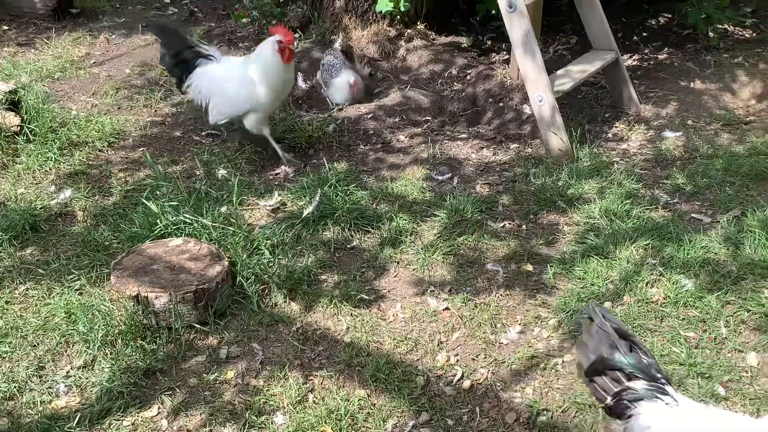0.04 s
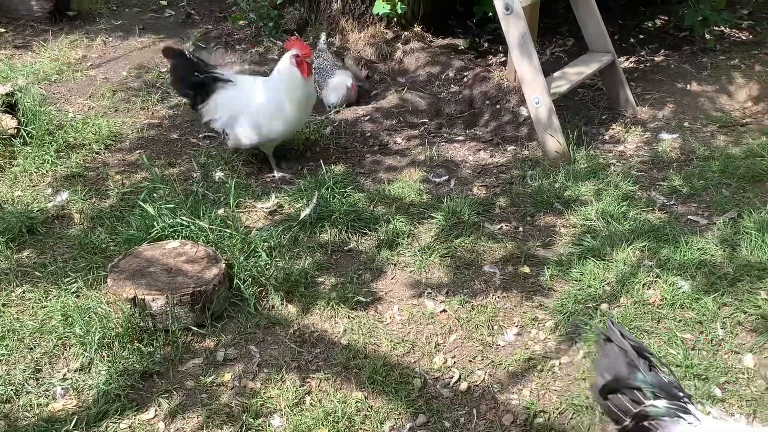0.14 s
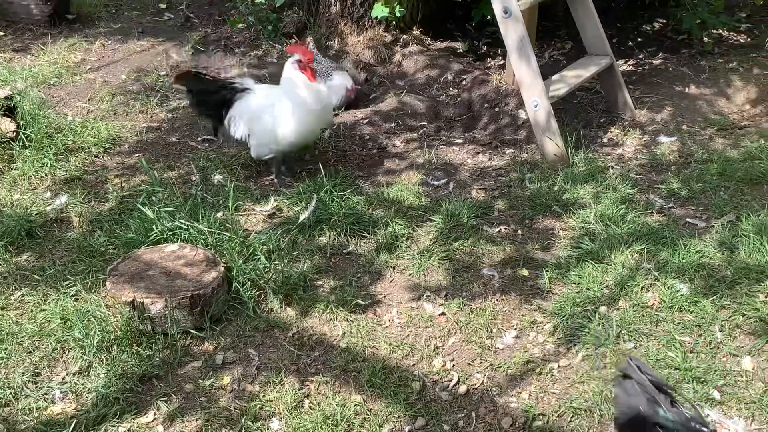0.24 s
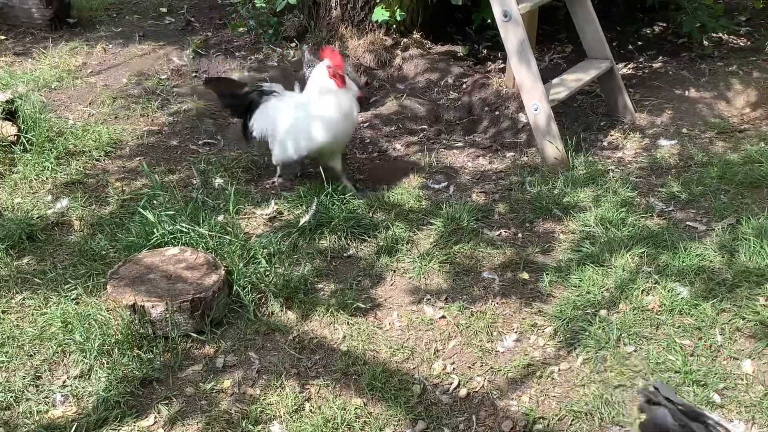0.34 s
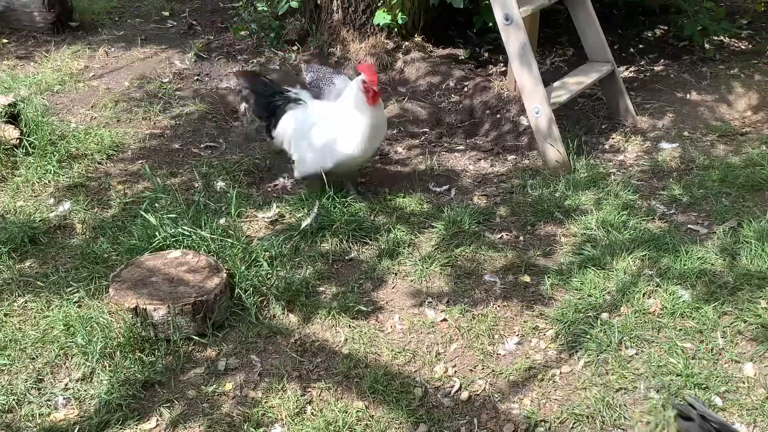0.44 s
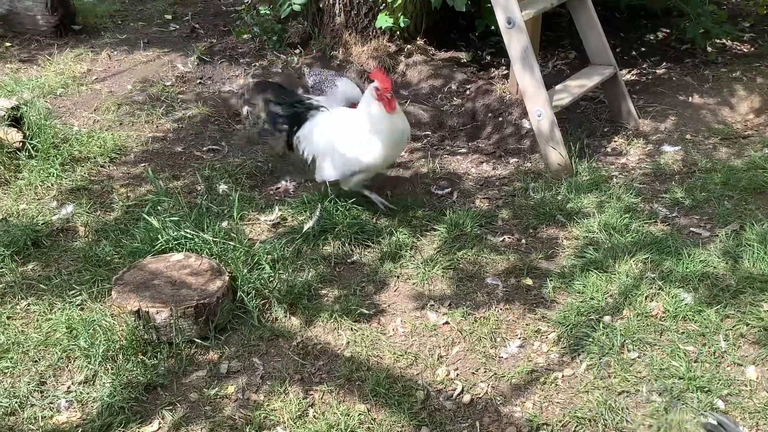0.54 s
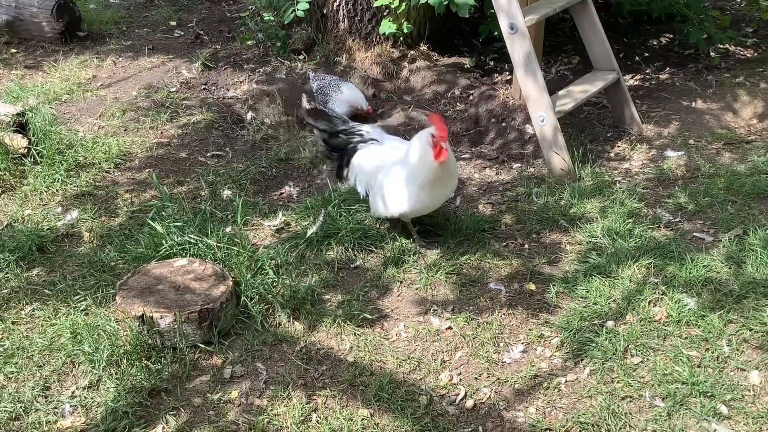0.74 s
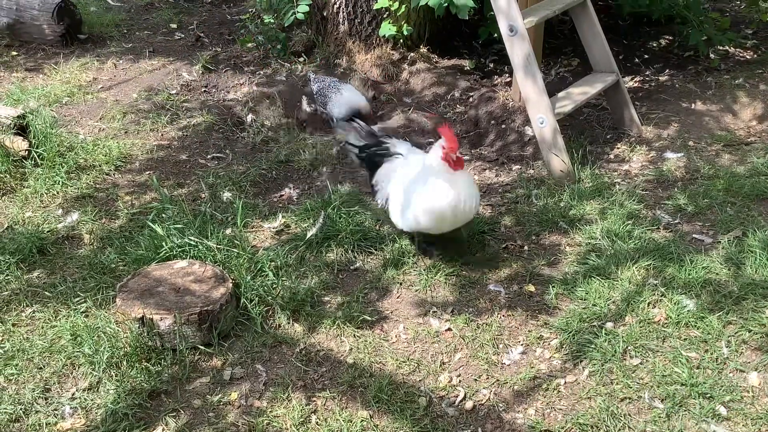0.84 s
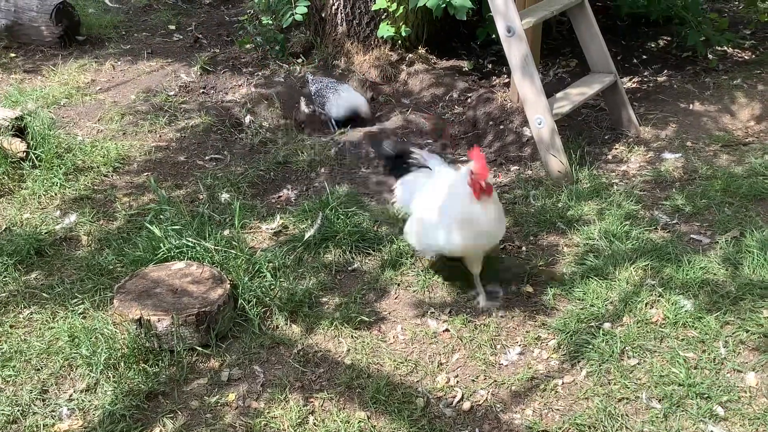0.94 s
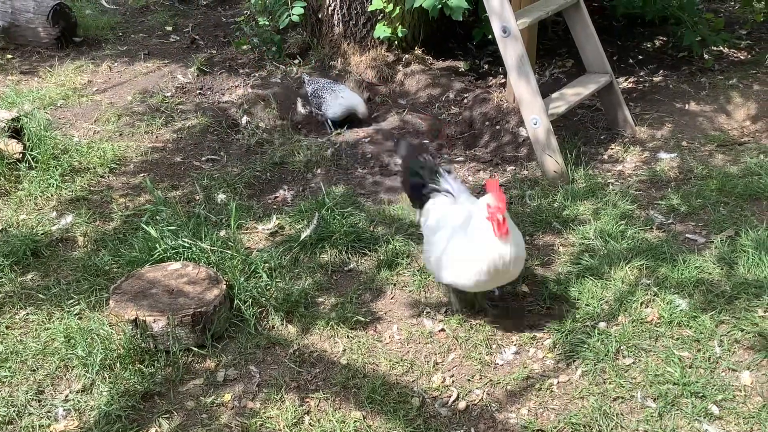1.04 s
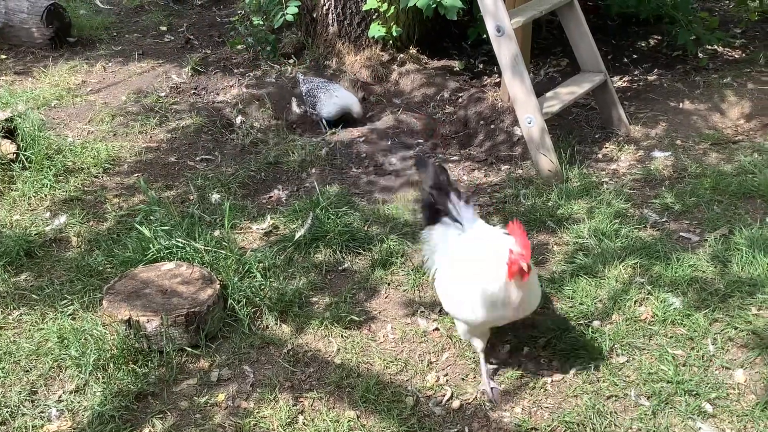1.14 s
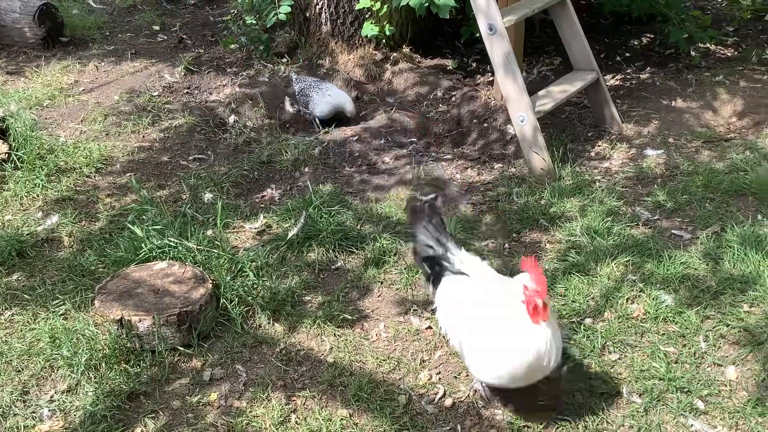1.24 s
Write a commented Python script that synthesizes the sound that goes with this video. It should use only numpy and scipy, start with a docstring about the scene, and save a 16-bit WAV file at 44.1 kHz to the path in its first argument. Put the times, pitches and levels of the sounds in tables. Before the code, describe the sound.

A rooster clucks and squawks twice in a quiet grass pen, then a hen clucks softly

```python
"""A grass pen with chickens, before a quiet outdoor background and short echoes from fence and trees.
A rooster clucks and gives two longer squawks, the first raspy, the second clear; a hen answers with softer
clucks and another whines far off. Each voice is a train of syrinx pulses ringing a throat filter, plus rasp.
Feet pad on soil, brush the grass and snap a dry leaf: shaped noise. Echoes are delays and a scattered tail."""
import sys
import numpy as np
from scipy import signal
from scipy.fft import rfft, irfft, next_fast_len
from scipy.io import wavfile
from scipy.ndimage import uniform_filter1d

SR = 44100
rng = np.random.default_rng(int(sys.argv[2]) if len(sys.argv) > 2 else 0)


def dump_mix(stems):
    """Bounce the given channels to the path in sys.argv[1] as a 16-bit WAV at rate SR."""
    frames = np.atleast_2d(stems).T  # one column per channel
    limited = np.clip(frames, -1, 1)  # hard clip at full scale
    pcm = np.round(limited * 32767).astype(np.int16)
    wavfile.write(sys.argv[1], SR, pcm)


N = 57330
T = np.arange(N) / SR  # s
CUTOFF_HZ = 15900  # upper edge of the harmonics and of the finished sound
TREBLE_HZ = 1560  # corner above which effort brightens a voice and the ground reflects

# Turbulent rasp of both squawks, relative spectrum [f/Hz, level/dB]
RASP_SPECTRUM = [(280, -38.5), (450, -16), (650, -4), (950, 4), (1150, -10), (1350, -21), (1550, -2),
                 (1820, -25), (2250, -13), (2650, -9), (3250, -18), (3900, -16), (4700, -17.5), (5400, -26),
                 (6300, -16.5), (9600, -28.5), (12500, -46), (16000, -56.5)]
# Course of the raspy squawk [t/s, pitch f/Hz, level/dB, treble level/dB, roughness level/dB]
RASPY_COURSE = [(.1925, 1052, -39, -12, -0.5), (.1955, 719, -29.5, -6.5, -1.5), (.2, 569.5, -27, -5.5, 1),
                (.206, 627.7, -26.5, 0, 5.5), (.213, 719.4, -23, -1, 2), (.224, 755, -20.5, 0, 0.5),
                (.238, 780.5, -20.5, -0.5, 0.5), (.254, 742.4, -21, 2.5, -2), (.263, 673, -23, 2.5, -7),
                (.269, 635, -27.5, 4.5, -4)]
# Throat resonances of the raspy squawk [f/Hz, level/dB]
RASPY_RESONANCES = [(300, -26.5), (520, -4.5), (760, -0.5), (1150, 0), (1330, -19), (1520, -11),
                    (1850, -21), (2250, -18), (2650, -10), (3250, -35), (3850, -23.5), (4700, -24.5),
                    (5400, -42), (6600, -36.5), (9600, -37.5), (12500, -54.5), (16000, -62)]


def raspy_squawk():
    """Subharmonics and turbulence: strongly uneven cycles and loud rasp roughen the rooster's call."""
    quality = dict(jitter=0.06, half_db=-8.5, rasp_db=-10, shimmer=0.0871)
    return long_call(RASPY_COURSE, RASPY_RESONANCES, quality, RASP_SPECTRUM)


# Course of the clear squawk [t/s, pitch f/Hz, level/dB, treble level/dB, roughness level/dB]
CLEAR_COURSE = [(.3675, 299.2, -41, -15, 5), (.372, 337, -43, -13, 4), (.379, 446.8, -38.5, -12, 10),
                (.384, 495.7, -29, -7.5, 8.5), (.391, 589.7, -26.5, -7.5, 1), (.398, 656, -26.5, 4, -12.5),
                (.412, 668, -24, 1, -10), (.42, 686, -22.5, 1, 1.5), (.433, 685.5, -23.5, 2, 2),
                (.44, 655, -24, -2.5, 2), (.446, 610, -35, -2, 3)]
# Throat resonances of the clear squawk [f/Hz, level/dB]
CLEAR_RESONANCES = [(300, -17), (500, -3), (680, 0), (1000, -1), (1350, -15), (1650, -34), (2050, -16.5),
                    (2650, -14.5), (3300, -29.5), (4050, -37.5), (4620, -21.5), (5400, -47.5),
                    (6500, -38.5), (7450, -28.5), (8500, -56.5), (9400, -32), (11000, -45.5),
                    (12200, -76.5), (16000, -49)]


def clear_squawk():
    """Harmonic excitation: steadier cycles and fainter rasp leave the rooster's harmonics plain."""
    quality = dict(jitter=0.03, half_db=-22, rasp_db=-18, shimmer=0.0321)
    return long_call(CLEAR_COURSE, CLEAR_RESONANCES, quality, RASP_SPECTRUM)


ROOSTER_QUALITY = dict(jitter=0.04, half_db=-24.5, rasp_db=-24, shimmer=0.12)  # terms as in voice()
# Course of the loudest cluck [t/s, pitch f/Hz, level/dB, treble level/dB, roughness level/dB]
LOUD_COURSE = [(.568, 380.1, -40, -1, 7.5), (.574, 456.1, -29, -3, 3), (.58, 494.3, -22, -0.5, -3.5),
               (.59, 506.8, -22.5, -5, 2), (.596, 500, -22, 2.5, 1.5), (.6, 596, -27, 5.5, 21),
               (.605, 620, -28, 6.5, 7.5), (.611, 592, -39, 4, 3)]
# Throat resonances of the loudest cluck [f/Hz, level/dB]
LOUD_RESONANCES = [(260, -14.5), (480, -10.5), (600, -4.5), (760, -2), (1020, 2), (1220, -11.5),
                   (1520, -21.5), (1780, -34), (2050, -21.5), (2350, -33), (3080, -24), (3900, -51),
                   (4600, -43.5), (5800, -54), (7400, -47.5), (9000, -55.5), (16000, -70)]


def loud_cluck():
    """Register break: the pitch of the rooster's loudest cluck leaps upward near its end."""
    return long_call(LOUD_COURSE, LOUD_RESONANCES, ROOSTER_QUALITY, LOUD_RESONANCES)


# The rooster's soft clucks [t/s, length t/s, first pitch f/Hz, top pitch f/Hz, pitch rise t/s,
# swollen level/dB, swell level/dB, treble level/dB, throat tuning/ratio]
ROOSTER_ROWS = [(.0765, 0.037, 296.5, 435, 0.022, -31.5, 12.5, -2, 1.0),
                (.808, 0.015, 265.8, 281, 0.0062, -37, 9, -10, 0.98)]
# Throat resonances of the rooster's soft clucks, before tuning [f/Hz, level/dB]
ROOSTER_RESONANCES = [(270, -8.5), (440, -11), (560, -1), (720, 3), (820, -11), (890, -0.5), (1100, 2),
                      (1330, -26), (2200, -33), (3500, -29), (5000, -45.5), (7200, -60), (8000, -39),
                      (9500, -61), (16000, -67)]


def rooster_clucks():
    """Source and filter: short pulse trains of gliding pitch ring the rooster's throat."""
    return clucks(ROOSTER_ROWS, ROOSTER_RESONANCES, ROOSTER_QUALITY)


# The hen's clucks [t/s, length t/s, first pitch f/Hz, top pitch f/Hz, pitch rise t/s,
# swollen level/dB, swell level/dB, treble level/dB, throat tuning/ratio]
HEN_ROWS = [(.659, 0.029, 290, 433.3, 0.017, -42, 13.5, -1.9, 1.01),
            (.887, 0.034, 285, 451, 0.027, -41.5, 15.2, 0.11, 0.96),
            (1.098, 0.034, 275, 456.9, .021, -41.5, 7.9, -0.9, 1.013)]
# Throat resonances of the hen, before tuning [f/Hz, level/dB]
HEN_RESONANCES = [(280, -6), (440, -8), (650, -7), (900, -3.5), (1350, 0), (1750, -20), (2150, -24.5),
                  (2700, -20), (3200, -32), (3700, -21.5), (4400, -36.5), (5300, -26.5), (6200, -42),
                  (8300, -44), (9500, -34.5), (11500, -48), (16000, -57)]


def hen_clucks():
    """Source and filter: softer pulse trains with more rasp ring the hen's throat."""
    quality = dict(jitter=0.04, half_db=-15, rasp_db=-5, shimmer=0.1249)
    return clucks(HEN_ROWS, HEN_RESONANCES, quality)


# Course of the far hen's whine [t/s, pitch f/Hz, level/dB, treble level/dB, roughness level/dB]
WHINE_COURSE = [(1.248, 770, -72, -8, 1.5), (1.257, 801, -50, -15, -4.5), (1.28, 817, -55.5, -5, -1),
                (1.3, 775, -53.5, 6, 1)]
# Throat resonances of the far hen [f/Hz, level/dB]
WHINE_RESONANCES = [(400, -9), (800, -4), (1200, -9.5), (1600, 3), (2000, -21), (2500, -10), (3200, -29),
                    (5000, -21), (16000, -58)]


def far_whine():
    """Irregular oscillation: large jitter, half-harmonics and shimmer in a faint call."""
    quality = dict(jitter=0.2, half_db=-4, rasp_db=-4.5, shimmer=0.36)
    return long_call(WHINE_COURSE, WHINE_RESONANCES, quality, WHINE_RESONANCES)


def long_call(course, throat, quality, rasp_colour):
    """Continuous modulation: pitch, level, treble and roughness glide between the points of a course."""
    s, hz, db, treble_db, rough_db = np.transpose(course)
    outside = np.maximum(s[0] - T, 0) + np.maximum(T - s[-1], 0)
    gain = from_db(np.interp(T, s, db)) * np.exp(-outside / 0.0017)
    pitch = np.interp(T, s, hz)
    treble = np.interp(T, s, treble_db)
    roughness = np.interp(T, s, rough_db)
    return voice(pitch, gain, throat, quality, rasp_colour, treble, roughness)


def clucks(rows, throat, quality):
    """Envelope shaping: each cluck starts low, swells as its pitch climbs, and is cut off."""
    attack_s, release_s = 0.0014, 0.0029
    swell_share = 0.62  # part of the length spent swelling
    beak_db_per_s, beak_lead_s = 598, 0.0049  # the beak closes toward the end and takes the treble away
    out = 0
    for start, length, first_hz, top_hz, rise, db, swell_db, treble_db, tuning in rows:
        t = T - start
        climb = np.sin(np.pi / 2 * np.clip(t / rise, 0, 1)) ** 2
        pitch = first_hz + (top_hz - first_hz) * climb
        swell = from_db(db - swell_db * (1 - np.clip(t / (swell_share * length), 0, 1)))
        attack = np.clip(t / attack_s + 0.5, 0, 1)
        release = np.exp(-np.maximum(t - length, 0) / release_s)
        closing_db = beak_db_per_s * np.maximum(t - length + beak_lead_s, 0)
        tuned = [(hz * tuning, level) for hz, level in throat]
        gain = swell * attack * release
        out = out + voice(pitch, gain, tuned, quality, tuned, treble_db - closing_db)
    return out


# Every throat passes little bass [f/Hz, level/dB]
BASS_LOSS = [(50, -62.5), (180, -39.5)]


def voice(pitch, gain, throat, quality, rasp_colour, treble_db, rough_db=0, count=44):
    """Source-filter principle: jittering syrinx pulses ring the throat, with half-harmonics and puffed rasp."""
    # roughness adds pitch jitter (share, rms), half-harmonics and rasp
    jitter = quality["jitter"] * from_db(rough_db / 2)
    half_db = np.minimum(quality["half_db"] + rough_db, 0)
    rasp_db = quality["rasp_db"] + rough_db

    wobble, flutter = slow_noise(376), slow_noise(376)
    phase = 2 * np.pi * np.cumsum(pitch * (1 + jitter * wobble)) / SR
    sounding = gain > 1e-7
    k = np.arange(1, count + 1)[:, None]  # harmonic order
    smear = 0.2 * k ** 2  # rad; a soft syrinx spreads each pulse
    harmonics = np.cos(k * phase[sounding] - smear) * (k * pitch[sounding] < CUTOFF_HZ)
    pulses = np.zeros(N)
    pulses[sounding] = harmonics.sum(0)

    # cycles alternate strong and weak; the pattern slips by a wandering phase (rad)
    wander = 0.7 * slow_noise(90)
    uneven = 1 + from_db(half_db) * np.cos(phase / 2 + wander)
    tone = coloured(pulses * uneven, BASS_LOSS + throat)
    # level the tone to its running rms, then add shimmer (share, rms)
    power = uniform_filter1d(uniform_filter1d(tone ** 2, size=200), size=200)
    tone = tone / np.sqrt(np.abs(power) + 1e-6) * (1 + quality["shimmer"] * flutter)

    # rasp comes in uneven spurts, spread in dB, and is puffed once a cycle
    spurts = from_db(3.5 * slow_noise(130))
    puffs = rng.standard_normal(N) * spurts * (1 + 0.53 * np.cos(phase))
    rasp = rms_one(coloured(puffs, BASS_LOSS + rasp_colour))
    sound = tone + from_db(rasp_db) * rasp

    # the treble grows faster than the effort, by 0.45 dB per dB
    bass = signal.sosfiltfilt(signal.butter(4, TREBLE_HZ, fs=SR, output="sos"), sound)
    effort = (gain / gain.max()) ** 0.45
    sound = bass + (sound - bass) * from_db(treble_db) * effort
    low_cut = signal.butter(3, 246, "high", fs=SR, output="sos")
    return signal.sosfilt(low_cut, gain * sound)


# Snaps of a dry leaf [t/s, level/dB, decay t/s]
LEAF_SNAPS = [(0.9878, -40, 0.00039), (.989, -55, 0.0015), (.992, -53, .0005), (1.0026, -53, 0.0018),
              (1.0043, -41.5, 0.00037), (1.0073, -51, 0.0012)]
# Leaf and grass noise, relative spectrum [f/Hz, level/dB]
LEAF_SPECTRUM = [(500, -24), (2500, -4.5), (4200, -7.5), (6000, 2), (10000, 1), (13000, -1), (16000, 1.5)]
# Feet brushing through grass [t/s, brush level/dB, width t/s, thud level/dB]
FOOTFALLS = [(0.131, -82, 0.032, -56.5), (1.005, -64, 0.012, -69), (1.21, -83, 0.082, -64.5),
             (1.295, -65, 0.0098, -52)]
# A foot padding on soil, relative spectrum [f/Hz, level/dB]
THUD_SPECTRUM = [(25, -36), (70, -6.5), (170, -0.5), (260, -5), (600, -16), (2000, -40), (16000, -79)]


def footsteps():
    """Impact and friction: decaying noise snaps the leaf; bell-shaped swells pad the soil and brush the grass."""
    crackle, thud = noise(LEAF_SPECTRUM), noise(THUD_SPECTRUM)
    snaps = 0
    for s, db, decay in LEAF_SNAPS:
        snaps = snaps + from_db(db) * (T >= s) * np.exp(-np.abs(T - s) / decay)
    steps = 0
    for s, brush_db, width, thud_db in FOOTFALLS:
        contact = from_db(brush_db) * crackle + from_db(thud_db) * thud
        steps = steps + contact * np.exp(-0.5 * ((T - s) / width) ** 2)
    return snaps * noise(LEAF_SPECTRUM) + steps


# Echoes from fence and trees [delay t/s, level/dB]
PEN_ECHOES = [(.0225, -18.5), (.034, -21), (0.052, -29)]
# Colour of the scattered tail, relative spectrum [f/Hz, level/dB]
TAIL_SPECTRUM = [(200, -9.5), (450, -17), (720, 0), (1150, -7.5), (2400, 7.5), (4500, 6), (8000, 3.5),
                 (16000, -4)]


def pen(x):
    """Reflection and scattering: a treble ground bounce, a few short echoes and a thin diffuse tail."""
    tail_db, tail_t60_s = -15, 0.28
    treble = x - low_pass(x, TREBLE_HZ, order=1)
    ground = from_db(-18.5) * delayed(treble, 0.0019)
    echoes = sum(from_db(db) * delayed(x, delay) for delay, db in PEN_ECHOES)
    decay = from_db(-60 * T / tail_t60_s)
    onset = np.clip(T / 0.006, 0, 1)
    scatter = noise(TAIL_SPECTRUM) * decay * onset / np.sqrt(np.sum(decay ** 2))
    return ground + echoes + from_db(tail_db) * signal.fftconvolve(x, scatter)[:N]


# Echoes from trunk, bank and ladder, before dulling [delay t/s, level/dB]
TRUNK_ECHOES = [(.0265, -13.5), (.0345, -15.5), (.048, -22), (.066, -28.5), (.087, -30)]


def tree(x):
    """Low-pass reflection: dull echoes by the tree let the fundamental of a call ring on."""
    echoes = sum(from_db(db) * delayed(x, delay) for delay, db in TRUNK_ECHOES)
    return low_pass(echoes, 1130)


# Outdoor background, relative spectrum [f/Hz, level/dB]
AIR_SPECTRUM = [(20, -43.5), (40, -21.5), (60, -5.5), (85, 2.5), (130, -4.5), (250, -1.5), (450, -6.5),
                (800, -8), (1300, -18), (1800, -18.5), (2600, -20), (4000, -33), (7000, -35), (9000, -30.5),
                (9800, -23), (10800, -41.5), (12500, -41), (16000, -33)]


def background():
    """Stationary noise and decay: slowly swelling open air, and the dying echo of an earlier cluck."""
    air_db, air_rise_db_per_s = -63.5, 1
    echo_db, echo_decay_s = -51, 0.031
    air = from_db(air_db + air_rise_db_per_s * T) * noise(AIR_SPECTRUM)
    echo = low_pass(noise(BASS_LOSS + HEN_RESONANCES), 1500)
    return air + from_db(echo_db) * np.exp(-T / echo_decay_s) * echo


def from_db(db):
    """Logarithmic level: decibels become an amplitude ratio."""
    return 10 ** (np.asarray(db) / 20)


def rms_one(x):
    """Normalisation: scales a signal to unit rms."""
    return x / np.sqrt(np.mean(x ** 2) + 1e-20)


def at_hz(points, hz):
    """Spectral envelope: gain interpolated in dB over log frequency."""
    f, db = np.transpose(points)
    return from_db(np.interp(np.log(np.maximum(hz, 1)), np.log(f), db))


def low_pass(x, hz, order=2):
    """Low-pass filtering: dulls a sound above hz."""
    return signal.sosfilt(signal.butter(order, min(hz, SR / 2 - 1), fs=SR, output="sos"), x)


def slow_noise(hz):
    """Random modulation: low-passed noise of unit rms."""
    return rms_one(low_pass(rng.standard_normal(N), hz))


def noise(spectrum):
    """Spectral shaping: noise of the given colour and unit rms."""
    white = rfft(rng.standard_normal(N))
    return rms_one(irfft(white * at_hz(spectrum, np.fft.rfftfreq(N, 1 / SR)), N))


def coloured(x, spectrum):
    """Minimum phase: a causal filter of the given colour, so that its resonances ring."""
    size = next_fast_len(2 * N)
    cepstrum = irfft(np.log(at_hz(spectrum, np.fft.rfftfreq(size, 1 / SR))), size)
    # folding the cepstrum onto positive times makes the filter causal
    cepstrum[1:size // 2] *= 2
    cepstrum[size // 2 + 1:] = 0
    return irfft(rfft(x, size) * np.exp(rfft(cepstrum)), size)[:N]


def delayed(x, seconds):
    """Propagation delay: the same sound, later."""
    return np.interp(T - seconds, T, x, left=0)


def scene():
    """Superposition: the birds, their steps, the reflections and the open air add up."""
    squawks = raspy_squawk() + clear_squawk()
    rooster = loud_cluck() + rooster_clucks()
    hens = hen_clucks() + far_whine()
    birds = squawks + rooster + hens + footsteps()
    # the squawking rooster and the hen stand by the tree
    return (birds + pen(birds) + tree(squawks + hens) + background())[None]


def record(dry):
    """Band limiting: a zero-phase elliptic filter cuts the top steeply."""
    return signal.sosfiltfilt(signal.ellip(10, 0.05, 70, CUTOFF_HZ, fs=SR, output="sos"), dry)


dry = scene()
out = record(dry)
dump_mix(out)
```